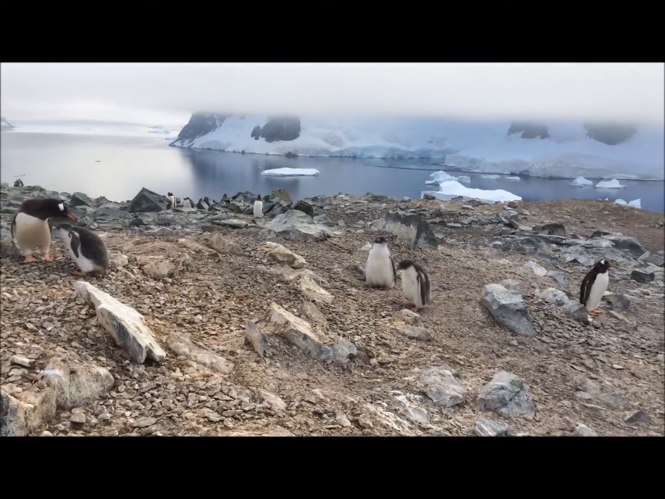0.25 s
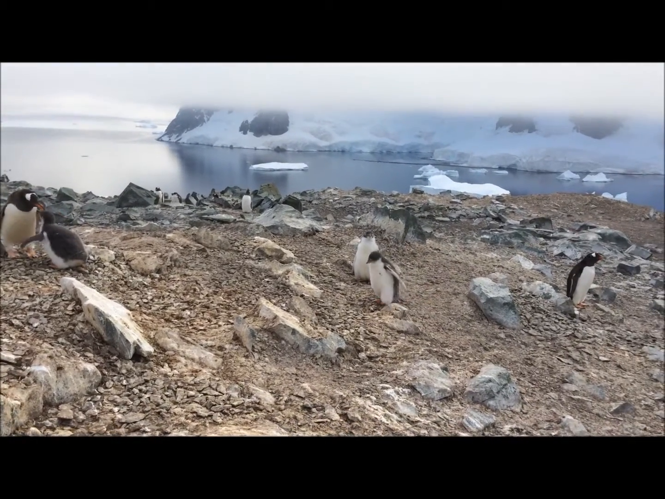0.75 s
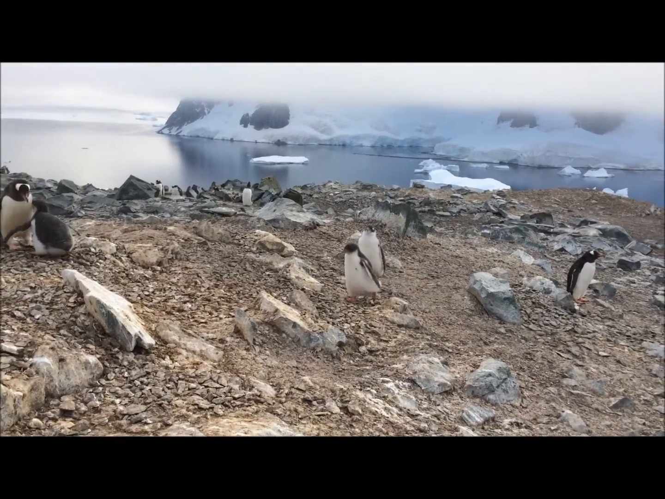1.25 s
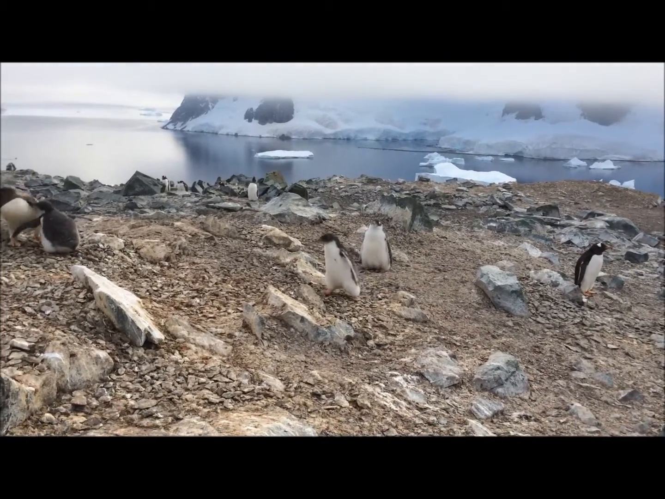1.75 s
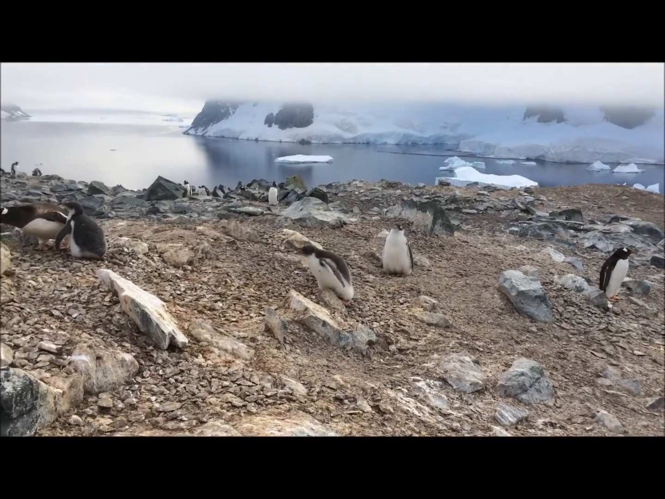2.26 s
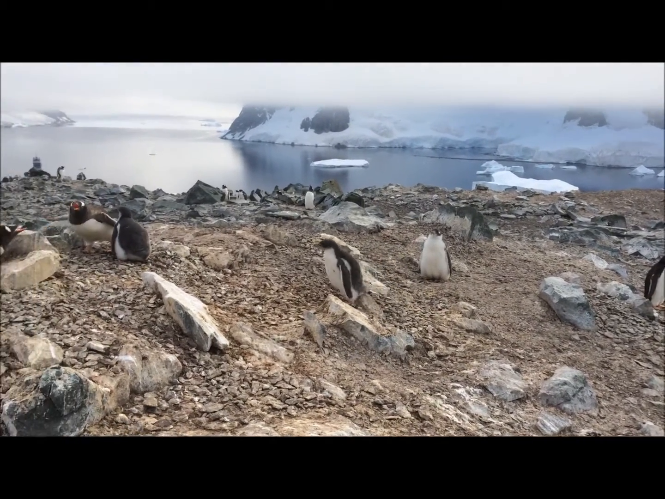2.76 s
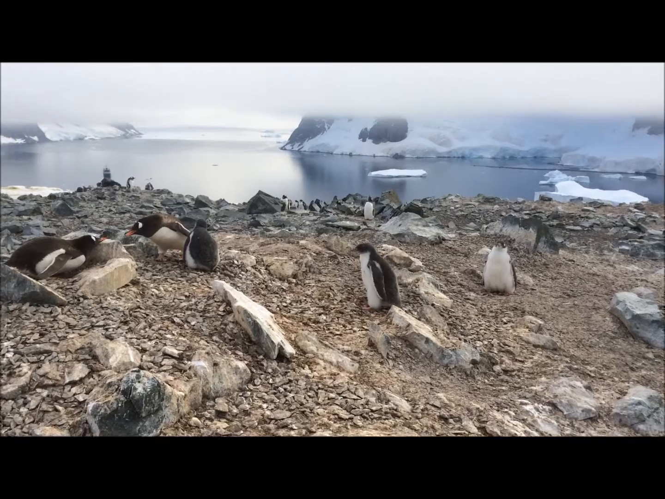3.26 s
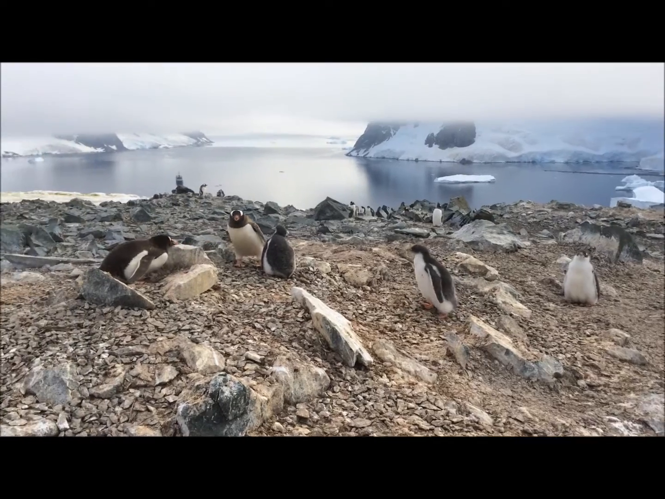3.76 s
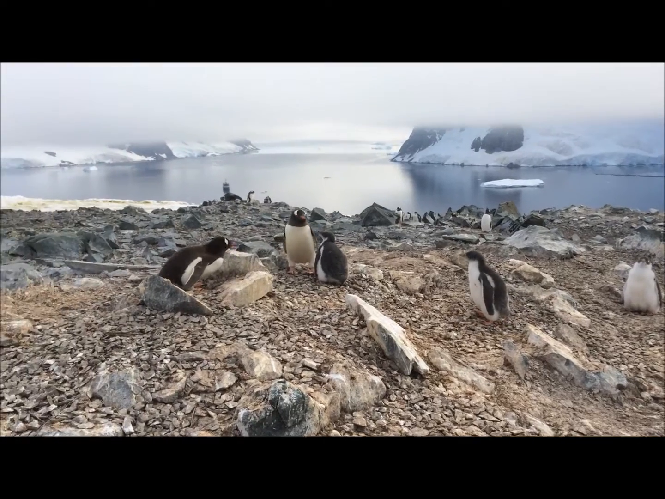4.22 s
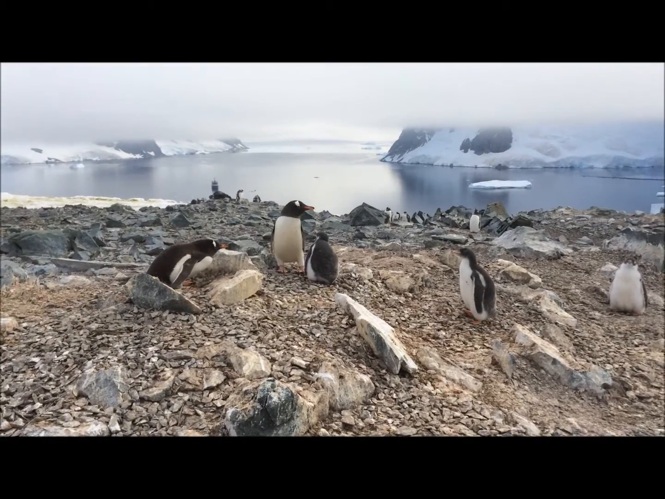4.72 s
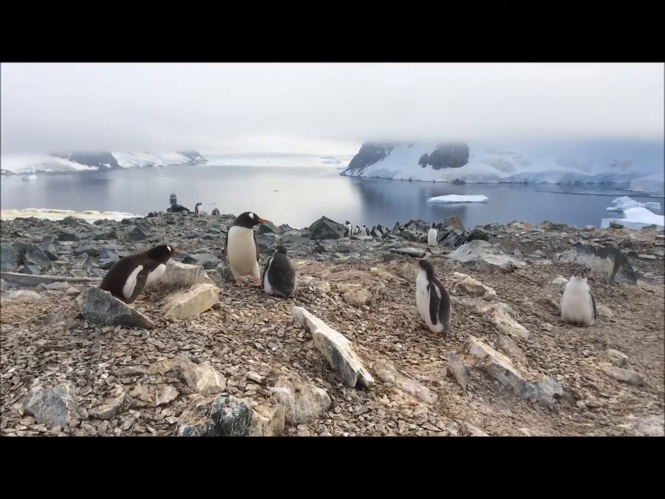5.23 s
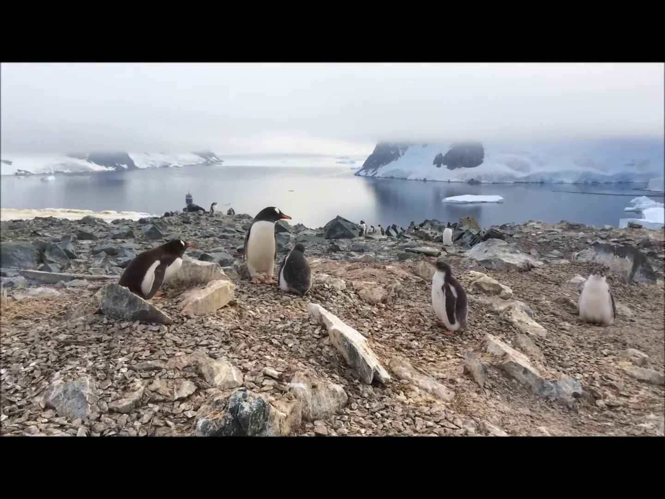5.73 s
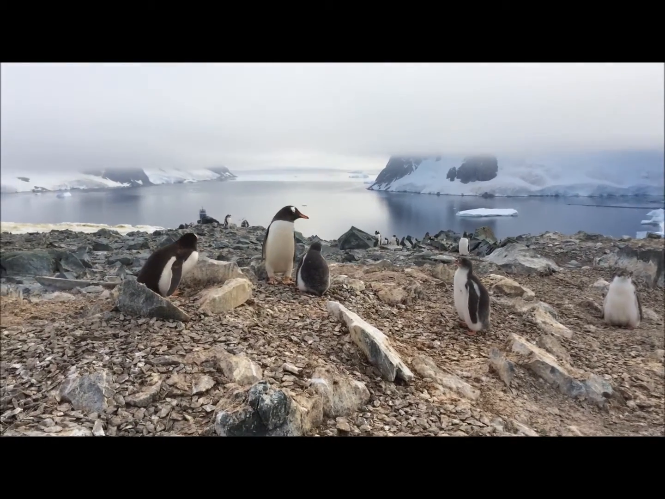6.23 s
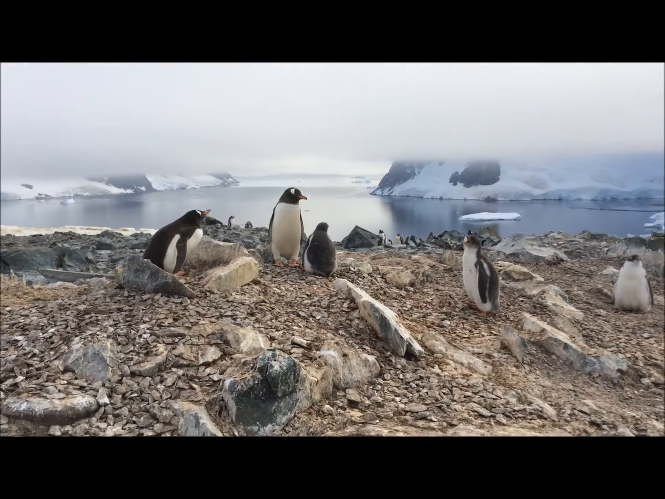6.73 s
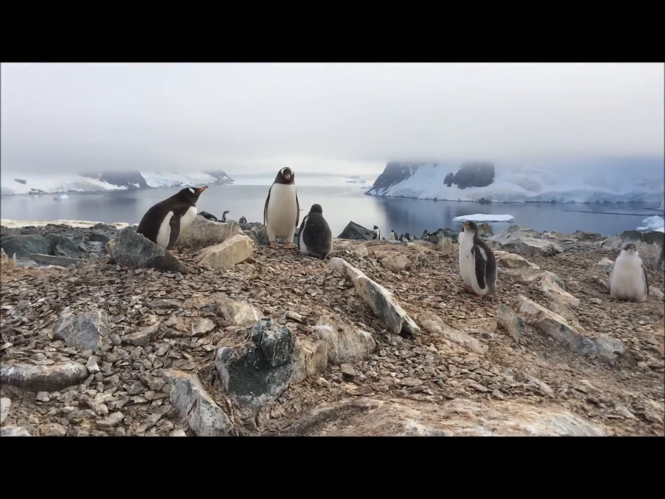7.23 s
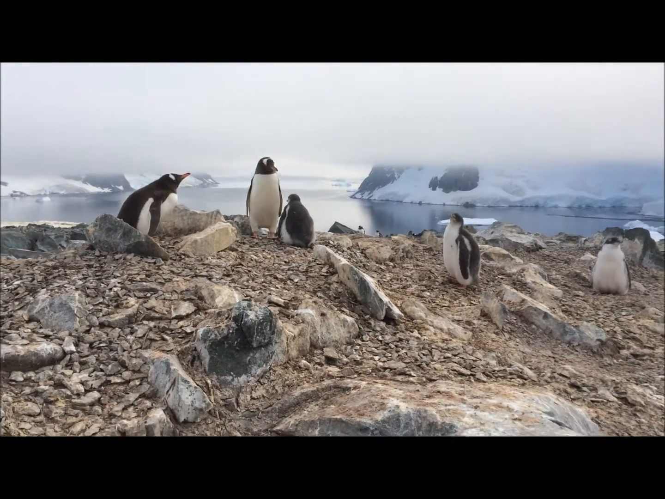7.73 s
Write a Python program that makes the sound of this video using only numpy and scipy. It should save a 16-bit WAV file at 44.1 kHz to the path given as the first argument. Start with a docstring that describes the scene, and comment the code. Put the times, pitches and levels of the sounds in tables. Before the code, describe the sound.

On open stony ground, loose stones tick, penguins peep and one grunts; later a chick whistles and squawks twice over a faint low rumble.

```python
"""A chick begs in two bursts of wavering two-voiced whistles, each ended by harsh squawks; an adult grunts,
bill snapping, and others peep, yelp and rattle further off. Loose stones click and scrape over a low rumble
and a faint breeze. A penguin colony on open stony ground: whistles are gliding sines, squawks and grunts
pulse trains through resonances, stones and bills clusters of tiny noise clicks, rumble and breeze shaped noise."""
import sys
import numpy as np
from scipy import signal
from scipy.fft import rfft, irfft
from scipy.io import wavfile
from scipy.ndimage import uniform_filter1d, map_coordinates

SR = 44100
rng = np.random.default_rng(int(sys.argv[2]) if len(sys.argv) > 2 else 0)


def transcribe(u):
    """Save the signal u as a 16-bit wav file named by the first command-line argument.

    u: samples, shape (n,) or (channels, n), limited to [-1, 1]; the rate is SR.
    q: integer samples, one column per channel.
    """
    v = np.clip(np.atleast_2d(u).T, -1, 1)
    q = np.round(v * 32767).astype(np.int16)
    wavfile.write(sys.argv[1], SR, q)


N = 351918
TIME = np.arange(N) / SR
TOP_HZ = 15700  # upper limit of the pulse harmonics and of the output

# knocks and scrapes of loose stones, and bills snapping during the grunt:
# start [t/s], length [t/s], body, clack, grit [level/dB]
STONES_AND_BILLS = [(0.282, 0.002, -65, -60, -49.5), (0.301, 0.017, -68, -58, -44.5),
                    (0.324, 0.0036, -69, -59, -61), (0.402, 0.013, -74, -66.5, -77),
                    (0.549, 0.0033, -64, -48.5, -52.5), (0.868, 0.015, -65, -57, -50.5),
                    (0.886, 0.015, -70.5, -69, -48), (0.926, 0.0066, -67.5, -63, -65),
                    (0.945, 0.00072, -62, -56, -60), (0.968, 0.0027, -86, -52.5, -45.5),
                    (0.975, 0.0032, -66, -70, -56), (0.984, 0.031, -72.5, -62, -64.5),
                    (1.123, 0.00057, -75, -66, -52.5), (1.3337, 0.0025, -61, -38, -49),
                    (1.415, 0.0063, -86, -56, -46), (1.437, 0.003, -79, -57, -57),
                    (1.688, 0.0082, -56.5, -57, -62), (1.732, 0.0071, -42.5, -60, -75),
                    (1.858, 0.0058, -35.5, -59, -71), (2.028, 0.027, -46, -57.5, -89),
                    (2.326, 0.0039, -46.5, -57, -52), (2.399, 0.0034, -81, -48.5, -52.5),
                    (2.42, 0.0031, -78, -49.5, -72), (2.524, 0.0062, -46.5, -54, -79),
                    (2.533, 0.11, -66, -60, -68), (2.564, 0.0038, -59, -69, -76),
                    (2.622, 0.0034, -49, -62, -68), (3.017, 0.0027, -64.5, -48, -56),
                    (3.424, 0.0056, -65.5, -65.5, -67.5), (4.073, 0.003, -65.5, -65, -73),
                    (4.905, 0.0048, -69, -60, -78), (5.479, 0.002, -88, -79, -59),
                    (5.502, 0.011, -93, -68, -57.5), (5.529, 0.0016, -67.5, -65, -44.5),
                    (5.531, 0.007, -78, -65, -49.5), (5.586, 0.00093, -88, -51, -52),
                    (5.599, 0.001, -81, -65, -59), (5.671, 0.0035, -60.5, -59.5, -88)]


def undb(db):
    """Decibels to gain."""
    return 10 ** (np.asarray(db) / 20)


def unit(x):
    """Scale to rms 1."""
    return x / np.sqrt(np.mean(x ** 2) + 1e-20)


def curves(table, t):
    """Interpolate a table's columns at times t; its first column is time."""
    s, *columns = np.transpose(table)
    return [np.interp(t, s, c) for c in columns]


def span(start, length):
    """Sample times of an event, at least 16 samples."""
    return start + np.arange(max(int(length * SR), 16)) / SR


def add(out, start, x):
    """Mix x in from a given time."""
    i = max(int(start * SR), 0)
    out[i:i + len(x)] += x[:max(N - i, 0)]


def band(x, low_hz, high_hz, order=2):
    """Butterworth band-pass."""
    edges_hz = [low_hz, min(high_hz, .47 * SR)]
    return signal.sosfilt(signal.butter(order, edges_hz, "band", fs=SR, output="sos"), x)


def colour(x, points):
    """Shape a spectrum by (Hz, dB) points, straight lines over log frequency."""
    hz, db = np.transpose(points)
    f = np.maximum(np.fft.rfftfreq(len(x), 1 / SR), 1)
    gain = undb(np.interp(np.log(f), np.log(hz), db))
    return irfft(rfft(x) * gain, len(x))


def wander(t, rate_hz):
    """Smooth chance with a spread near 1: random knots, rate_hz of them a second."""
    u = (t - t[0]) * rate_hz
    knots = rng.standard_normal(len(t) // 8 + 4)
    return map_coordinates(knots[:int(u[-1]) + 4], [u], order=2, mode="nearest")


def pulses(hz):
    """Band-limited pulses at a moving pitch: equal cosine harmonics."""
    phase = 2 * np.pi * np.cumsum(hz) / SR
    k = np.arange(1, int(TOP_HZ / hz.mean()) + 1)[:, None]
    return np.cos(k * phase).sum(axis=0)


def throat(x, resonances):
    """Parallel resonances with steep skirts and dark valleys between them."""
    parts = [undb(db) * band(x, max(hz - width_hz / 2, 30), hz + width_hz / 2)
             for hz, width_hz, db in resonances]
    return unit(sum(parts))


def arch(first, middle, last, progress, roundness=0.94):
    """A note's pitch bends once on its way from start to end; more roundness flattens both ends."""
    bulge = np.abs(np.sin(np.pi * progress)) ** roundness
    glide = first + (last - first) * (1 - np.cos(np.pi * progress)) / 2
    return glide + (middle - (first + last) / 2) * bulge


def grains(count, rate_hz, spread_db):
    """Sparse clicks of random sign and very uneven size."""
    chance, size, sign = rng.random(count), rng.exponential(size=count), rng.choice([-1, 1], count)
    return (chance < rate_hz / SR) * sign * undb(spread_db * np.minimum(size, 4))


def air(unsteady_db=0.42, flicker_db=1.34, rumble_gain_db=4.5, calm_db=-76.5):
    """An unsteady low rumble under a thin hiss that swells and dies back; both are shaped noise."""
    # spectra: f/Hz, relative level/dB
    rumble_spectrum = [(13, -55.5), (22, -21), (38, -6), (85, 1), (126, -5.5), (146, -8), (201, -15),
                       (265, -24), (288, -22), (350, -23.5), (385, -24), (431, -29.5), (600, -31),
                       (780, -74), (1320, -120)]
    breeze_spectrum = [(250, 9), (500, 3.5), (1000, 3.5), (2000, 1), (4000, -2), (8000, -5), (15000, -11.5)]
    # rumble contour: time [t/s], level before rumble_gain_db [level/dB]
    lulls = [(0.0, -63), (0.49, -60.5), (0.82, -66.5), (1.49, -63), (3.4, -64), (3.87, -63), (4.53, -61.5),
             (5.09, -66), (5.82, -65), (6.22, -61.5), (6.74, -62), (7.18, -61.5), (7.62, -61.5),
             (7.98, -63)]
    # breeze swells: peak [t/s], rise [t/s], fall [t/s], level [level/dB]
    swells = [(1.35, 0.091, .08, -62), (1.78, 0.3, .35, -66.5), (2.52, 0.45, .25, -67),
              (5.2, .15, .25, -67.5), (6.798, .35, .47, -59.5)]
    rumble = unit(colour(rng.standard_normal(N), rumble_spectrum))
    rumble_db = rumble_gain_db + curves(lulls, TIME)[0] + unsteady_db * wander(TIME, 12)
    power = undb(calm_db) ** 2
    for peak, rise, fall, db in swells:
        away = np.maximum((peak - TIME) / rise, (TIME - peak) / fall)
        power = power + (undb(db) * np.exp(-away)) ** 2
    hiss = unit(colour(rng.standard_normal(N), breeze_spectrum))
    breeze = hiss * np.sqrt(power) * undb(flicker_db * wander(TIME, 17))
    return rumble * undb(rumble_db) + breeze


def grit(rate_hz=70, rest_db=-83.5, stir_db=-17, lead_s=0.025, settle_s=0.056):
    """Fine ticks of gravel, faint at rest, swell around each knock or scrape by its grit level, then settle."""
    power = undb(rest_db) ** 2
    for start, length, _, _, grit_db in STONES_AND_BILLS:
        before = np.maximum(start - TIME, 0) / lead_s
        after = np.maximum(TIME - start - length, 0) / settle_s
        power = power + undb(grit_db + stir_db) ** 2 * np.exp(-2 * np.minimum(before + after, 20))
    t = span(0, 0.012)
    tick = rng.standard_normal(len(t)) * np.exp(-t / 0.00097)
    ticks = signal.fftconvolve(grains(N, rate_hz, spread_db=6.0), tick)[:N]
    return unit(band(ticks, 4200, 8700, order=1)) * np.sqrt(power)


def far_chicks(waver=0.0055, flutter_db=1.5):
    """Thin arched peeps: a wavering sine and its octave."""
    # start [t/s], length [t/s], start, middle, end pitch [f/Hz], fundamental, octave [level/dB]
    peeps = [(0.058, 0.092, 3260, 3430, 4380, -76.5, -88), (0.205, 0.12, 3780, 4170, 4150, -82, -74),
             (0.27, 0.14, 3820, 3610, 3300, -77, -87), (0.31, 0.15, 2680, 2620, 2520, -82.5, -100),
             (0.38, 0.084, 4940, 4650, 4700, -87, -99), (0.435, 0.055, 4030, 3700, 4050, -79, -87),
             (0.668, 0.034, 2460, 2630, 2770, -75.5, -91), (0.68, 0.056, 3690, 3480, 2960, -63.5, -74),
             (0.836, 0.1, 3400, 3010, 3390, -70.5, -90), (1.04, 0.13, 3440, 3120, 3200, -82, -105),
             (1.407, 0.094, 3600, 3650, 3400, -73, -82), (1.584, 0.11, 3000, 3060, 2910, -71.5, -82),
             (1.612, 0.085, 3740, 3450, 3550, -64.5, -77), (1.725, 0.12, 3580, 3725, 3590, -62.5, -53),
             (1.743, 0.067, 3200, 2940, 3320, -70, -74), (2.711, 0.052, 3390, 2900, 3170, -70.5, -79),
             (3.022, 0.072, 3750, 4200, 3550, -74.5, -100), (3.02, 0.07, 3170, 3300, 3350, -82, -100),
             (3.082, 0.063, 3330, 3880, 3470, -71, -102), (3.723, 0.15, 3090, 3210, 3250, -82.5, -86),
             (3.938, 0.21, 3450, 4130, 3710, -73.5, -97), (4.209, 0.14, 4420, 4440, 4520, -77.5, -97),
             (6.18, 0.062, 4470, 4500, 4450, -74, -99)]
    out = np.zeros(N)
    for start, length, first, middle, last, db, octave_db in peeps:
        t = span(start, length)
        hz = arch(first, middle, last, np.linspace(0, 1, len(t)))
        phase = 2 * np.pi * np.cumsum(hz * (1 + waver * wander(t, 136))) / SR
        tone = undb(db) * np.sin(phase) + undb(octave_db) * np.sin(2 * phase)
        envelope = signal.windows.tukey(len(t), .5) * undb(flutter_db * wander(t, 50))
        add(out, start, np.sqrt(2) * tone * envelope)
    return out


def colony(count=14, until_s=2.5, centre_hz=3300, db=-84):
    """The faintest peeps of the crowd, sines at chance times, each on its own wavering pitch."""
    out = np.zeros(N)
    for when, size, pitch in rng.random((count, 3)):
        t = span(when * until_s, 0.043 + 0.035 * size)
        hz = centre_hz * 2 ** (.7 * (pitch - .5) + 0.061 * wander(t, 25))
        tone = np.sqrt(2) * np.sin(2 * np.pi * np.cumsum(hz) / SR)
        add(out, t[0], undb(db) * tone * signal.windows.tukey(len(t), .6))
    return out


def stones_and_bills(slip_rate_hz=2500, first_slip=8, knock_s=0.0037, ring_s=0.00023, tail_s=0.011,
                     tail_db=-29):
    """Each event is a cluster of tiny clicks with a very short ring; knocks start hard, scrapes swell."""
    # body, clack and grit ranges: low, high [f/Hz]
    ranges = [(330, 2110), (2500, 8460), (6800, 15000)]
    out, t = np.zeros(N), span(0, .03)
    for start, length, *levels in STONES_AND_BILLS:
        slips = grains(len(span(0, length)), slip_rate_hz, spread_db=4)
        slips = slips * signal.windows.tukey(len(slips), .3)
        slips[0] += first_slip * np.exp(-length / knock_s)
        for (low_hz, high_hz), db in zip(ranges, levels):
            decay = np.exp(-t / ring_s) + undb(tail_db) * np.exp(-t / tail_s)
            ring = rng.standard_normal(len(t)) * decay
            clack = band(signal.fftconvolve(slips, ring), low_hz, high_hz, order=3)
            # the level holds over the event's length, not over its tail
            add(out, start, unit(clack) * undb(db) * np.sqrt((length + 0.00032) * SR / len(clack)))
    return out


def croaks(jitter=0.0765, rasp=0.8, throat_width_hz=380, chest_hz=310, chest_width_hz=190, leak_db=-15):
    """Rattles of a closed beak: slow, uneven pulses and noise ring chest and throat, with a wider leak."""
    # start [t/s], length [t/s], pulse rate [f/Hz], level [level/dB], throat resonance [f/Hz],
    # chest resonance re throat [level/dB]
    rattles = [(0.717, 0.063, 149, -62.5, 930, -4.5), (2.523, 0.078, 104.6, -54.5, 1940, 7.5)]
    out = np.zeros(N)
    for start, length, hz, db, throat_hz, chest_db in rattles:
        t = span(start, length)
        source = unit(pulses(hz * (1 + jitter * wander(t, 92.5)))) + rasp * rng.standard_normal(len(t))
        resonances = [(chest_hz, chest_width_hz, chest_db),
                      (throat_hz, throat_width_hz, 0),
                      (throat_hz, 0.66 * throat_hz, leak_db)]
        add(out, start, undb(db) * throat(source * signal.windows.tukey(len(t), .5), resonances))
    return out


def thuds():
    """Dull knocks of feet on the ground: each a short sine under a bell-shaped envelope."""
    # centre [t/s], pitch [f/Hz], envelope spread [t/s], envelope peak [level/dB]
    knocks = [(1.029, 175, 0.0052, -43), (1.38, 163, 0.0056, -47.5), (2.625, 845, 0.001, -36.5),
              (5.326, 72, 0.0086, -42), (5.549, 107, 0.002, -40), (5.579, 70, 0.0087, -46),
              (5.617, 118, 0.0025, -36), (5.65, 115, 0.004, -45.5), (7.594, 383, 0.016, -61.5)]
    out = np.zeros(N)
    for centre, hz, spread_s, db in knocks:
        t = span(-.08, .16)
        envelope = undb(db) * np.exp(-(t / spread_s) ** 2 / 2)
        add(out, centre + t[0], envelope * -np.sin(2 * np.pi * hz * t))
    return out


def grunt(jitter=0.0195, shimmer_db=1.9, rasp=0.97, soft_hz=380, full_db=-39, flutter_db=3):
    """An adult's low buzz of sharp pulses that mellows to a hum when the effort drops."""
    # time [t/s], pitch [f/Hz], level [level/dB]
    contour = [(1.737, 235.5, -34), (1.751, 238.4, -53.5), (1.795, 227.9, -44.5), (1.815, 233, -53),
               (1.841, 241.3, -38.5), (1.877, 245.6, -38), (1.903, 231.7, -44.5), (1.943, 259.7, -39.5),
               (1.969, 255.7, -40.5), (1.981, 243, -41), (2.017, 230.7, -49.5), (2.029, 228.4, -40.5),
               (2.047, 236, -41), (2.076, 230, -51)]
    # voice spectrum: f/Hz, relative level/dB
    spectrum = [(120, -12), (240, 1), (500, -8.5), (740, -12), (980, -10), (1250, -13.5), (1750, -15.5),
                (2400, -38), (3700, -35), (6000, -41), (12000, -75)]
    t = span(contour[0][0], contour[-1][0] - contour[0][0])
    hz, db = curves(contour, t)
    source = unit(pulses(hz * (1 + jitter * wander(t, 249.2)))) * undb(shimmer_db * wander(t, 242.3))
    # air escapes after each pulse, dying away over 4.2 ms
    puffs = unit(signal.lfilter([1], [1, -np.exp(-1 / (0.0042 * SR))], np.maximum(source, 0) ** 2))
    hoarse = band(puffs * rng.standard_normal(len(t)), 510, 9000, order=1)
    buzz = unit(colour(source + rasp * hoarse, spectrum))
    hum = signal.sosfiltfilt(signal.butter(2, soft_hz, fs=SR, output="sos"), buzz)
    # the edge of the voice comes and goes as the throat tightens
    effort = np.minimum(undb(db - full_db), 1) * undb(flutter_db * wander(t, 67.8))
    voice = hum + effort * (buzz - hum)
    out = np.zeros(N)
    add(out, t[0], voice * undb(db) * signal.windows.tukey(len(t), .05))
    return out


def squawks(jitter=0.13, rasp=1.9, shimmer_db=5, attack_s=.004, release_s=0.0054, sag=0.78, bend=0.046,
            top_hz=8500, fall=.17, fall_s=.06):
    """Short bursts of uneven pulses and rasp ring the throat; the beak's opening sets the vowel."""
    # start [t/s], length [t/s], pitch before fall and bend [f/Hz], level [level/dB], roughness [-],
    # beak opening [0-1]
    calls = [(2.08, 0.014, 312, -69.5, 0.74, 0.16), (2.156, 0.015, 758, -74, 0.27, 0),
             (2.225, 0.11, 487, -67.5, 0.27, 0.56), (2.284, .036, 426, -62.5, 1.1, 0.32),
             (2.348, 0.0085, 428, -73.5, 0.33, 0.3), (2.43, 0.016, 480, -72, .65, 0.7),
             (2.948, 0.011, 532, -77, .42, 0.9), (3.146, 0.024, 590, -70.5, .15, 0),
             (3.163, 0.017, 540, -67.5, 0.4, 0.55), (3.229, 0.018, 494, -71, 0.27, .8),
             (3.296, 0.026, 511, -69, 0.32, .85), (3.366, 0.047, 527, -70.5, 0.7, 0.57),
             (5.023, 0.026, 474, -65, 0.46, 0.67), (5.047, 0.034, 522, -60.5, 0.3, .7),
             (5.077, 0.061, 507, -62, 0.42, 0.73), (5.189, 0.021, 528, -69.5, 0.42, 0.56),
             (5.266, 0.053, 540, -61.5, 0.65, 0.66), (5.317, 0.02, 475, -45.5, 0.7, 0.15),
             (5.329, .038, 406.7, -51, 0.6, 0), (6.347, 0.02, 522, -67, 0.73, 0.5),
             (6.529, 0.014, 555, -68.5, 0.61, 0.79), (6.7825, .012, 577, -36, 0.4, 1),
             (6.791, .012, 589, -37.5, 0.32, 0.89), (6.808, 0.018, 618, -56.5, 0.45, 1),
             (6.8528, 0.014, 587, -35.5, 0.25, 0.9), (6.903, 0.02, 375.5, -49.5, 0.49, 0.8),
             (7.176, 0.011, 516, -73.5, 0.8, 0.7), (7.209, 0.0086, 602, -68, 0.5, 0.8),
             (7.887, .007, 532, -77.5, .77, 1)]
    # throat resonances, beak wide open and nearly shut: centre [f/Hz], width [f/Hz], gain [level/dB]
    open_beak = [(527, 93, -10.5), (1090, 220, -13.5), (1535, 373, 5.5), (1813, 360, -1.5),
                 (2330, 530, -11.5), (2845, 330, -7.5), (3730, 400, -11.5), (4600, 1100, -13.5),
                 (5930, 1800, -18)]
    shut_beak = [(463.4, 333, 0.5), (956, 430, -3), (1220, 560, 4), (1950, 640, -1.5), (3150, 930, -13),
                 (4400, 880, -11), (6200, 650, -18)]
    out = np.zeros(N)
    for start, length, pitch_hz, db, rough, opening in calls:
        t = span(0, length + 0.027)
        progress = np.minimum(t / length, 1)
        hz = pitch_hz * (1 - fall * (1 - np.exp(-t / fall_s)))
        hz = hz * (1 + bend * (np.sin(np.pi * progress) - .5))
        hz = hz * (1 + jitter * rough * wander(t, 500))
        source = unit(pulses(hz)) * undb(shimmer_db * rough * wander(t, 400))
        source = source + rasp * rough * rng.standard_normal(len(t))
        # pressure builds quickly, sags, and dies away once the push ends
        attack = np.sin(np.pi / 2 * np.minimum(t / attack_s, 1)) ** 2
        pressure = attack * np.exp(-sag * progress - np.maximum(t - 0.81 * length, 0) / release_s)
        source = band(source * pressure, 110, top_hz)
        opening = np.clip(opening, 0, 1)
        voice = unit(opening * throat(source, open_beak) + (1 - opening) * throat(source, shut_beak))
        # the level is taken over the call's length, without its tail
        add(out, start, voice * undb(db) * np.sqrt(len(t) / (length * SR)))
    return out


def phrase(table, t, attack_s, release_s, swell_db):
    """Slur syllables into one voice: pitch, gain and tone quality; each swells towards its middle."""
    total, pitch, gain, quality = 1e-9, 0.0034, 0, 0
    for start, length, first, middle, last, db, tone in table:
        progress = np.clip((t - start) / length, 0, 1)
        on = np.clip((t - start) / attack_s + .5, 0, 1)
        on = on * np.clip((start + length - t) / release_s + .5, 0, 1)
        total = total + on
        pitch = pitch + on * arch(first, middle, last, progress, roundness=1.1)
        gain = gain + on * undb(db + swell_db * (np.sin(np.pi * progress) - 1))
        quality = quality + on * tone
    sounding = total > 1e-6
    hz = np.interp(t, t[sounding], (pitch / total)[sounding])  # bridges the gaps
    return hz, gain, quality / total


def whistle(t, hz, gain, overtone_db, rasp, waver=0.0038, rasp_jitter=0.034, rasp_flutter=1.0, rasp_hz=560,
            sidebands=1.3, third_db=-14, glide_s=0.0049, beak_hz=8600, pass_hz=4280, fall_db_per_oct=44.5):
    """One side of the syrinx: a near sine that breaks into a rasp when pushed."""
    hz = uniform_filter1d(hz, int(glide_s * SR) + 1, mode="nearest")  # muscles round every turn of pitch
    # fades above the beak's pass band, less so in a harsh, gaping call
    octaves_above = np.maximum(np.log2(hz / pass_hz), 0)
    gain = gain * undb(-fall_db_per_oct * (1 - rasp) * octaves_above)
    hz = hz * (1 + waver * wander(t, 330) + rasp_jitter * rasp ** 2 * wander(t, 1500))
    phase = 2 * np.pi * np.cumsum(hz) / SR
    # the beak passes little above its resonance
    overtone = undb(overtone_db) / np.sqrt(1 + (2 * hz / beak_hz) ** 16)
    tone = np.sin(phase) + overtone * (np.sin(2 * phase) + undb(third_db) * np.sin(3 * phase))
    # a slower, unsteady vibration chops the whistle and gives it sidebands
    chop = np.sin(2 * np.pi * np.cumsum(rasp_hz * (1 + 0.079 * wander(t, 200))) / SR)
    roughness = 1 + rasp ** 2 * (rasp_flutter * wander(t, 900) + sidebands * chop)
    return np.sqrt(2) * tone * gain * roughness


def near_chick(first_overtone_db=-29, second_overtone_db=-18, low_rasp=0.047):
    """Both sides of the syrinx sing at once, one swoops, one stays low; the second burst is brighter."""
    # both: start [t/s], length [t/s], start, middle, end pitch [f/Hz], level before beak fall [level/dB],
    # then rasp [0-1] (swoops) or octave re fundamental before beak loss [level/dB] (undertones)
    swoops = [(4.884, 0.013, 4750, 4800, 5200, -51.5, .1), (4.932, .022, 5450, 4700, 4250, -48.5, 0.4),
              (4.954, .019, 4180, 4110, 4300, -38, 0.2), (4.975, .029, 4700, 4980, 4860, -49.5, 0.63),
              (5.056, .036, 5000, 5350, 5200, -56, 0), (5.096, .02, 5020, 4930, 4740, -44.5, 0),
              (5.116, 0.049, 4700, 4740, 3810, -43, 0), (5.166, 0.043, 3770, 4000, 4040, -39, 0.13),
              (5.206, .046, 4080, 4185, 4030, -29.5, .1), (5.252, .013, 4050, 4100, 4340, -30, .1),
              (5.265, 0.031, 4600, 4880, 4450, -42, 0.77), (5.296, .015, 4234, 4100, 3560, -33.5, 0.5),
              (6.404, .026, 4180, 4460, 4550, -43, 0.24), (6.43, .048, 4510, 4290, 4450, -37.5, 0.14),
              (6.478, .024, 4420, 4670, 4740, -45, 0), (6.611, 0.057, 3750, 5000, 3193, -43, 0.3),
              (6.667, 0.059, 3200, 3970, 3477, -42.5, 0.26), (6.722, .063, 3460, 4850, 3520, -40, .72),
              (6.785, 0.055, 3530, 5120, 3370, -37, 0.8), (6.852, .043, 3415, 4300, 3710, -41, .65)]
    undertones = [(4.905, 0.039, 3553, 3550, 3530, -64, 1.5), (4.945, 0.052, 3470, 3430, 3580, -56.5, -7),
                  (5.005, 0.037, 3690, 3734, 3450, -50.5, -17), (5.048, 0.061, 3340, 3670, 3440, -71, -4),
                  (5.1, 0.079, 3420, 3420, 3600, -54, -23), (5.2, 0.064, 3590, 3660, 3680, -46.5, -26),
                  (5.26, 0.061, 3765, 3805, 3200, -41, -20.5), (6.42, 0.12, 3380, 3472, 3567, -49, -13),
                  (6.542, 0.058, 3460, 3660, 3232, -51.5, -24),
                  (6.615, 0.042, 3300, 3460, 3315, -45.5, -28),
                  (6.668, 0.048, 3280, 3380, 3475, -46.5, -15), (6.738, 0.032, 3600, 3785, 3560, -38.5, -9),
                  (6.8, 0.056, 3484, 3650, 3336, -38, -20), (6.856, .037, 3330, 3390, 3270, -46, -23)]
    t = span(4.8, 2.2)
    hz, gain, rasp = phrase(swoops, t, attack_s=.006, release_s=.006, swell_db=5.0)
    second_burst = t > 6
    high = whistle(t, hz, gain, np.where(second_burst, second_overtone_db, first_overtone_db), rasp)
    hz, gain, overtone_db = phrase(undertones, t, attack_s=0.007, release_s=0.012, swell_db=4.5)
    low = whistle(t, hz, gain, overtone_db, low_rasp)
    out = np.zeros(N)
    add(out, t[0], high + low)
    return out


def rocks(x, t60_s=0.16, scatter_db=-27):
    """Open ground: only a faint, short scatter, a decaying noise tail, comes back from the boulders."""
    t = span(0, .4)
    tail = band(rng.standard_normal(len(t)), 360, 7000, order=1) * np.exp(-np.log(1000) * t / t60_s)
    return x + undb(scatter_db) * signal.fftconvolve(x, tail / np.linalg.norm(tail))[:N]


def scene():
    """Voices, stones, bills and grit scatter off the rocks; thuds and air stay dry."""
    birds = near_chick() + far_chicks() + colony() + squawks() + grunt() + croaks()
    return (rocks(birds + stones_and_bills() + grit()) + thuds() + air())[None]


def record(dry):
    """Cut the top: a steep elliptic low-pass at TOP_HZ."""
    return signal.sosfilt(signal.ellip(10, .2, 80, TOP_HZ, fs=SR, output="sos"), dry)


dry = scene()
out = record(dry)
transcribe(out)
```